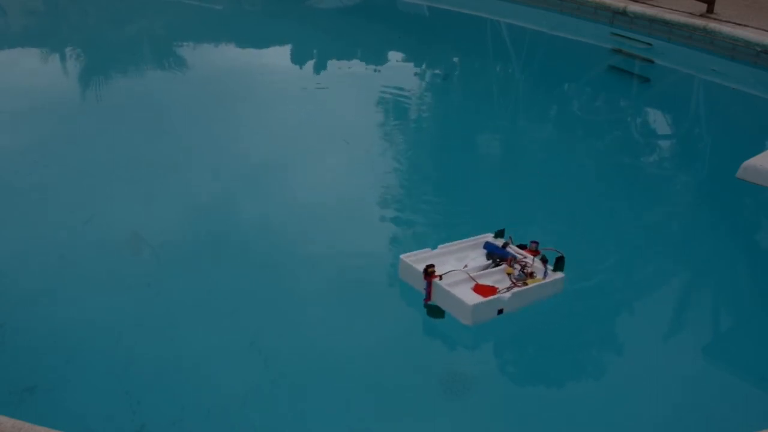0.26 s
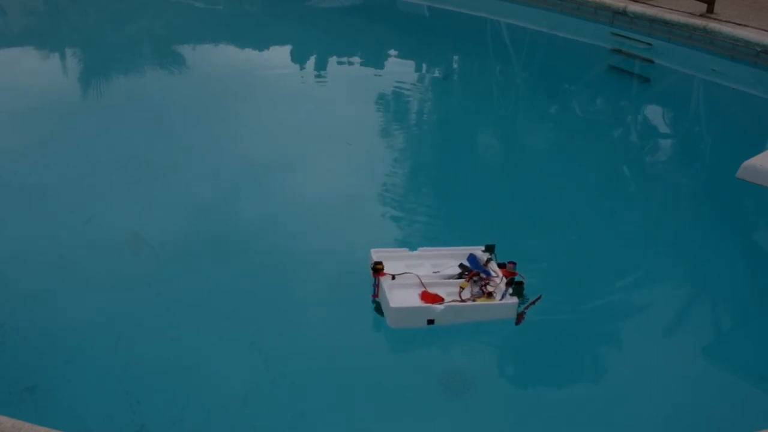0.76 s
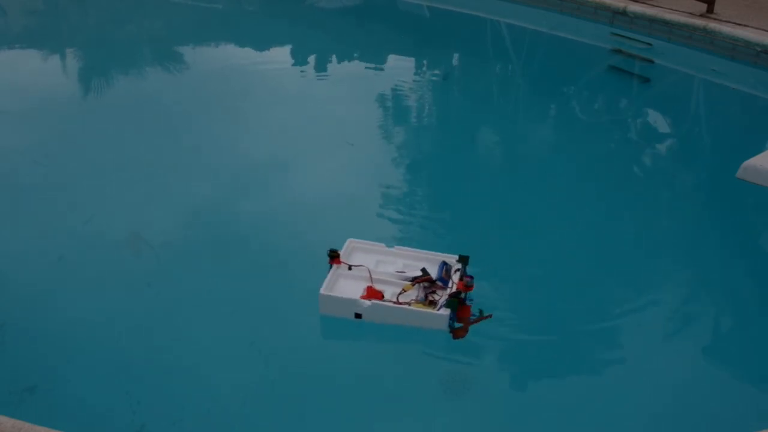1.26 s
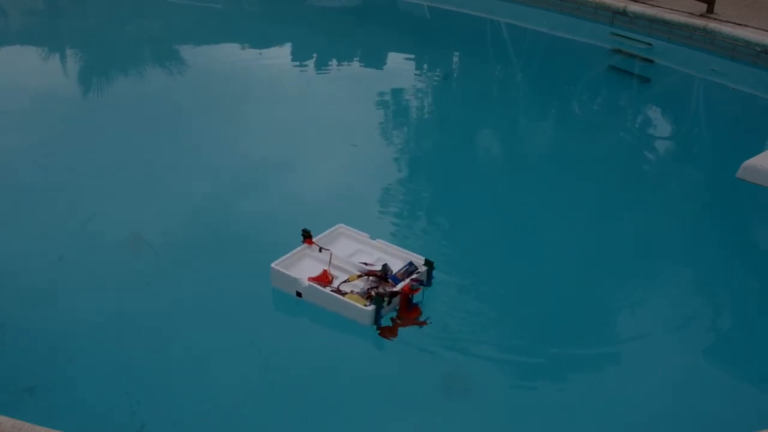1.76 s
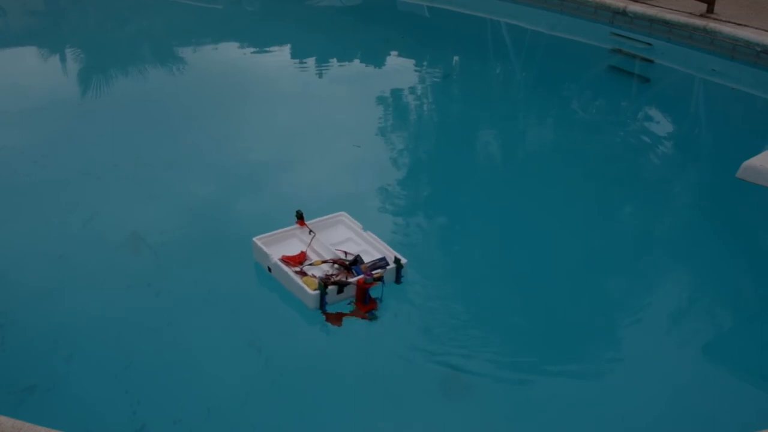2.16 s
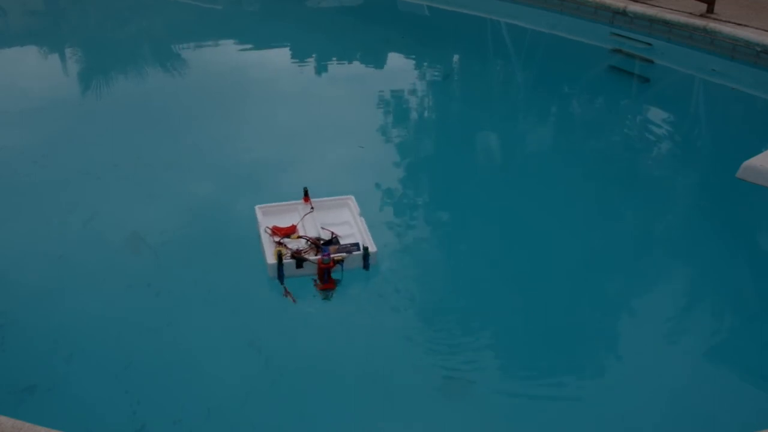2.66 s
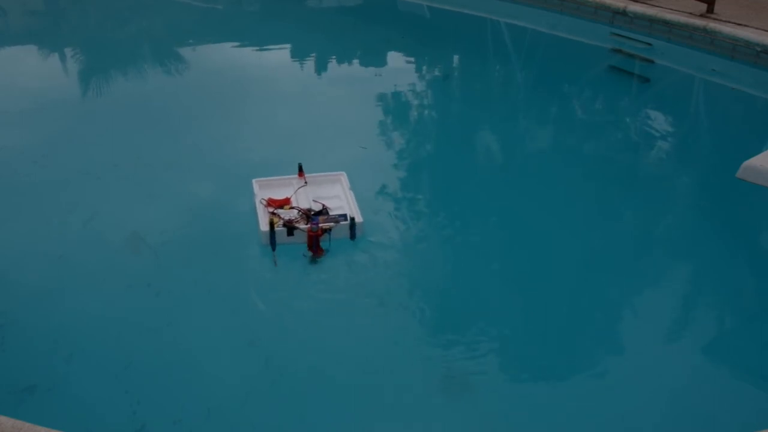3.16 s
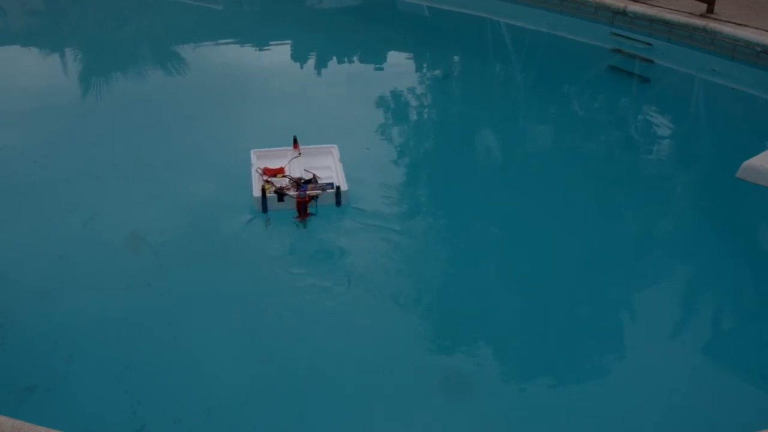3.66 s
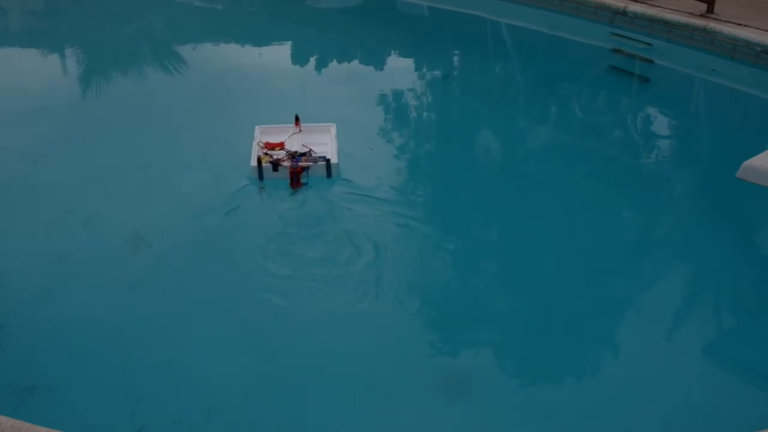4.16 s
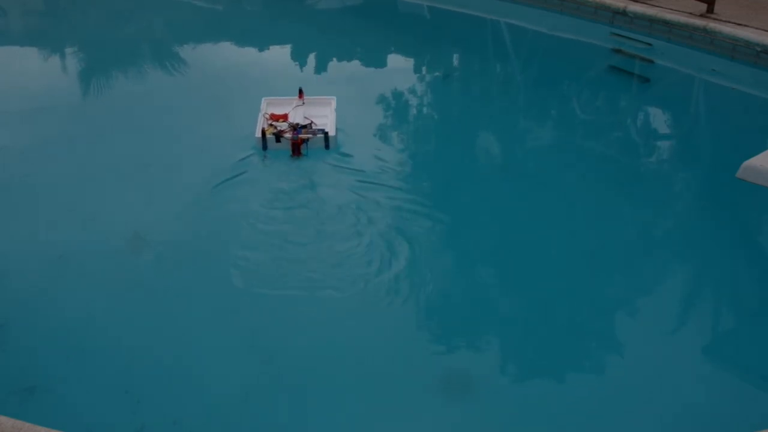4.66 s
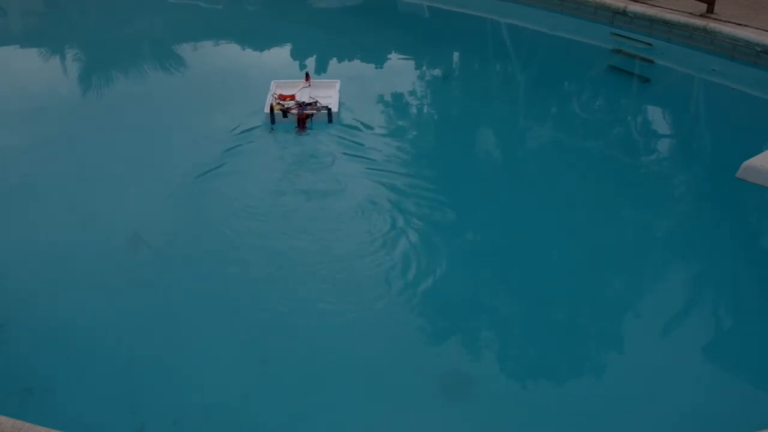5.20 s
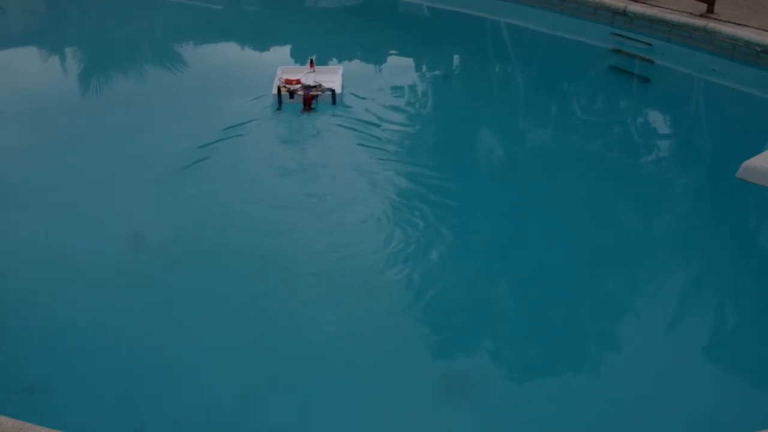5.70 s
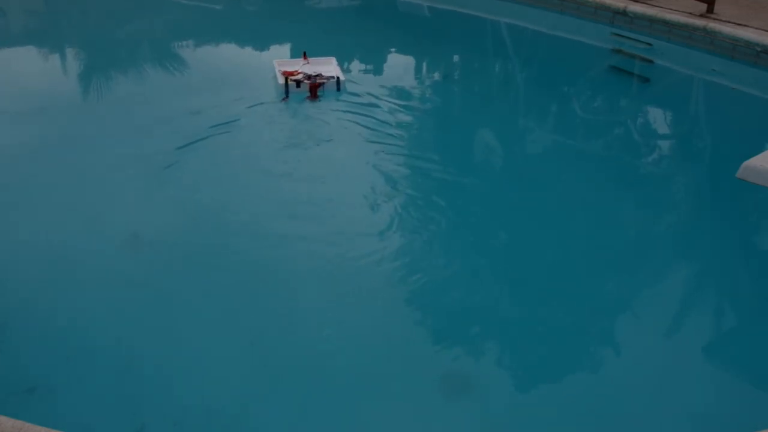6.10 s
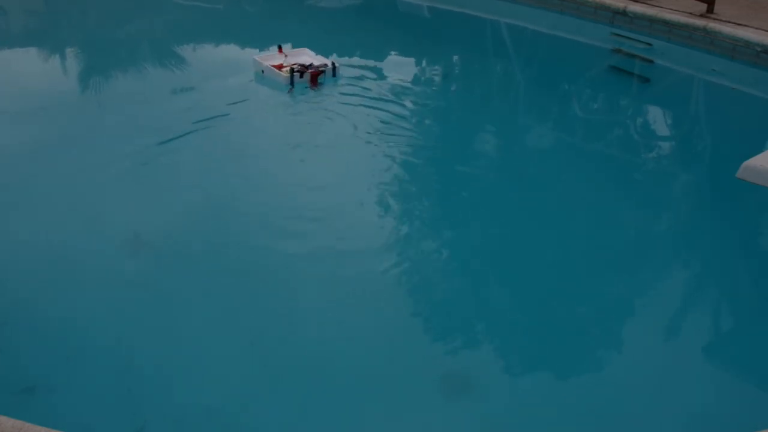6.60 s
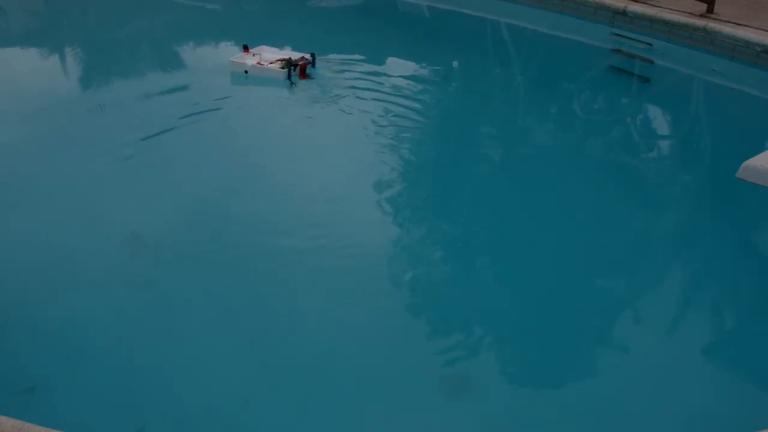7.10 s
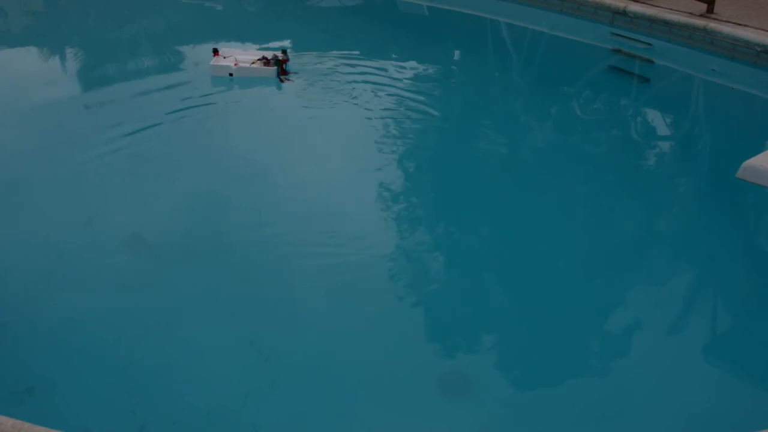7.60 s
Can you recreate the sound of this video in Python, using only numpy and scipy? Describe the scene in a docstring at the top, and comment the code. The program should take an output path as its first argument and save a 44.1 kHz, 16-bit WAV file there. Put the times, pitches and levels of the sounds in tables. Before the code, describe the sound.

The buzzing gears and thin high whine of a model boat run steadily, surge twice, then settle as it moves away.

```python
"""Model boat on a swimming pool.

A small boat with a foam tray for a hull turns, speeds up twice and moves off. Its motor drives the
propeller through a 6:1 gear: the teeth clatter in the hull, hardest once a propeller turn, with a knock
and a squeak. The motor hums, its brushes rasp, and the speed controller's switching whines high above."""
import sys
import numpy as np
from scipy import signal
from scipy.fft import rfft, irfft
from scipy.io import wavfile
from scipy.ndimage import uniform_filter1d

SR = 44100
rng = np.random.default_rng(int(sys.argv[2]) if len(sys.argv) > 2 else 0)


def wav_record(signal):
    """Record a signal, one row per channel, as 16-bit PCM in the file named by sys.argv[1]."""
    frames = np.transpose(np.atleast_2d(signal))
    bounded = np.clip(frames, -1, 1)
    # unit amplitude maps onto the largest positive 16-bit level
    quanta = np.round(bounded * 32767).astype(np.int16)
    wavfile.write(sys.argv[1], SR, quanta)


N = 346180
TIME = np.arange(N) / SR
PINION_TEETH, GEAR_RATIO = 12, 6


def undb(db):
    """Decibels to gain."""
    return 10 ** (np.asarray(db) / 20)


def unit(x):
    """Scale to rms 1."""
    return x / np.sqrt(np.mean(x ** 2))


def curve(table):
    """Interpolate (t/s, value) rows to every sample."""
    return np.interp(TIME, *np.transpose(table))


def wander(rate_hz):
    """Smooth random motion, rms 1."""
    hold = max(int(SR / rate_hz), 2)
    steps = np.repeat(rng.standard_normal(N // hold + 1), hold)[:N]
    return unit(uniform_filter1d(steps, hold))


def tone(cycles, slip, rate_hz=40):
    """Sine of rms 1, wavering in level and, by slip cycles rms, in phase."""
    size = undb(1.8 * wander(rate_hz))
    return unit(np.sin(2 * np.pi * (cycles + slip * wander(rate_hz))) * size)


def band(x, lo_hz, hi_hz):
    """Steep band-pass."""
    return signal.sosfilt(signal.butter(4, [lo_hz, hi_hz], "band", fs=SR, output="sos"), x)


def colour(x, response, size=4096):
    """Minimum-phase filter from (f/Hz, level/dB) rows."""
    hz, db = np.transpose(response)
    bins_hz = np.maximum(np.arange(size // 2 + 1) * SR / size, 1)
    cepstrum = irfft(np.log(undb(np.interp(np.log(bins_hz), np.log(hz), db))))
    cepstrum[1:size // 2] *= 2
    cepstrum[size // 2 + 1:] = 0
    return signal.fftconvolve(x, irfft(np.exp(rfft(cepstrum))))[:N]


def radiate(x, responses, views, lo_hz, hi_hz):
    """Crossfade the responses of the turning boat's sides, each levelled within a band."""
    out, views = 0, np.array(views)
    for response, db, active in zip(responses, views[:, 2], np.eye(len(views))):
        heard = colour(x, response)
        fade = np.interp(TIME, views[:, :2].ravel(), np.repeat(active, 2))
        out = out + fade * undb(db) * heard / band(heard, lo_hz, hi_hz).std()
    return out


def racing(speed_rps):
    """0 at cruising speed, 1 at full throttle."""
    return np.interp(speed_rps, [120, 185], [0, 1])


def wheel_angle(turns, tight_at=.49):
    """Gear wheel angle in radians from its tightest point, given motor turns."""
    return 2 * np.pi * (turns / GEAR_RATIO - tight_at)


def mesh_load(turns, depth):
    """The wheel runs out of true and presses hardest once a propeller turn."""
    angle = wheel_angle(turns)
    return (1 + depth * (np.cos(angle) + .27 * np.cos(2 * angle))) / np.sqrt(1 + depth ** 2 / 2)


# Boat's course: t/s, distance/m
COURSE = [(0, 2.94), (1.5, 3.82), (3, 3.6), (4.5, 5.25), (5.2, 5.1), (6, 5.9), (7.85, 6.6)]
def carry(speed_rps, db_per_octave, ref_rps=120, ref_m=3):
    """Gain that grows with shaft speed and falls as 1 / distance."""
    return undb(db_per_octave * np.log2(speed_rps / ref_rps)) * ref_m / curve(COURSE)


# Reflections: initial extra path/m, drift/(m/s), level/dB
ECHOES = [(.9, .05, -14), (2.6, -.12, -15), (5.5, .06, -18)]
def poolside(x, sound_m_per_s=343):
    """The poolside returns late copies that comb the noise, shifting as the boat moves."""
    copies = sum(undb(db) * np.interp(TIME - (path_m + drift * TIME) / sound_m_per_s, TIME, x)
                 for path_m, drift, db in ECHOES)
    return (x + copies) / np.sqrt(1 + sum(undb(db) ** 2 for _, _, db in ECHOES))


# Outdoor air spectrum: f/Hz, level/dB
AIR = [(15, -35), (30, -3), (60, -2.5), (100, -8.5), (200, -4), (500, -12.5), (2000, -78), (15000, -74)]
def background(air_db=-60, mains_db=-68, hum_hz=119.6):
    """Still outdoor air and a faint mains hum."""
    mains = tone(hum_hz * TIME, slip=.02)
    air = unit(colour(rng.standard_normal(N), AIR))
    return air * undb(air_db) + mains * undb(mains_db)


# Switching tone, swelling and fading as the boat moves: t/s, level/dB
WHINE = [(0.0, -53), (0.08, -53), (0.22, -34.5), (0.39, -47), (0.98, -39), (1.09, -46), (1.53, -36),
         (1.68, -51), (2.53, -36), (2.69, -44), (2.73, -36.5), (4.26, -46.5), (4.33, -39), (6.16, -54),
         (6.23, -40), (6.3, -50), (6.43, -36), (6.78, -48), (7.61, -43), (7.85, -51)]
def controller(turns, speed_rps, idle_hz=12346, idle_rps=105, sag_hz_per_rps=.93):
    """Switched current makes the windings sing; the turning rotor adds side tones."""
    switch_hz = idle_hz - sag_hz_per_rps * (speed_rps - idle_rps)  # the supply sags under throttle
    cycles = np.cumsum(switch_hz) / SR
    sides = [(2, 0), (-2, -1), (4, -17), (-4, -17), (1, -15), (-1, -15), (-3, -15), (-6, -15)]
    ripple = sum(undb(db) * tone(cycles + order * turns, slip=.14, rate_hz=35) for order, db in sides)
    fizz = tone(cycles, slip=.26, rate_hz=87)
    centre = tone(cycles, slip=.07 + .12 * racing(speed_rps), rate_hz=25) * undb(1.5 * wander(20))
    return centre * undb(curve(WHINE) + 1) + ripple * undb(-49) + fizz * undb(-54)


# Squeak toward the listener: t/s, level/dB
SQUEAK = [(1.6, -62), (2.25, -38), (2.8, -50), (3.15, -34), (3.6, -35.5), (4.25, -28), (4.8, -28.5),
          (5.3, -37), (5.5, -47), (6.5, -46), (7, -62)]
def squeak(turns, speed_rps, spot_turns=.91, width_turns=.035):
    """One spot of the wheel chafes: a tiny squeak each wheel turn, higher at speed."""
    hz = np.interp(speed_rps, [122, 140, 205], [6900, 8500, 9300])
    hz *= 1 + .04 * (.3 + racing(speed_rps)) * wander(900)
    offset_turns = (turns / GEAR_RATIO - spot_turns + .5) % 1 - .5
    contact = np.exp(-(offset_turns / width_turns) ** 2 / 2)
    return tone(np.cumsum(hz) / SR, slip=.1) * contact * undb(curve(SQUEAK))


def knock(turns, speed_rps):
    """Soft knock at the wheel's tightest point; the hull radiates it only as speed lifts its pitch."""
    puffs = np.exp(1.8 * np.cos(wheel_angle(turns)))
    thud = unit(tone(11 * turns / GEAR_RATIO, slip=.03) * puffs)
    return band(thud, 275, 520) * undb(-52) * carry(speed_rps, db_per_octave=12)


# Gear tones, swelling as the hull turns or rings: t/s, sigma/s, propeller order, level/dB
MESH_TONES = [(.62, 0.11, 16, -48.5), (2.05, 0.35, 47, -41), (3.5, 0.1, 132, -41), (3.572, 0.23, 72, -40.5),
              (4.03, 0.095, 34, -36), (4.26, 0.098, 25, -29.5), (4.56, 0.17, 22, -33), (4.57, .09, 28, -39),
              (4.55, 0.22, 72, -40), (4.62, .12, 150, -43), (4.883, 0.12, 47, -38.5),
              (5.172, 0.11, 72, -39.5), (6.85, 0.27, 61, -43.5), (7.05, 0.36, 84, -44), (7.2, 1, 26, -51.5),
              (7.5, 0.43, 43, -47)]
def mesh_whine(turns, load):
    """Tones of the meshing teeth throb with the wheel; play blurs the higher ones most."""
    out = 0
    for peak_s, sigma_s, order, db in MESH_TONES:
        line = tone(order * turns / GEAR_RATIO, slip=min(.06 + order / 420, .21), rate_hz=55)
        swell = np.exp(-((TIME - peak_s) / sigma_s) ** 2 / 2)
        out = out + line * undb(db) * swell
    return out * load


# Commutation hum, swelling as the boat turns: t/s, level/dB
COMMUTATION = [(0, -34.5), (.12, -51), (.2, -38), (.48, -33.5), (.58, -38.5), (.66, -33.5), (.86, -37.5),
               (1, -41.5), (1.25, -39), (1.48, -52), (1.58, -36), (1.68, -40), (1.75, -64), (2.2, -40),
               (2.92, -34.5), (3.1, -43), (3.3, -41), (3.6, -40), (3.9, -39), (4.05, -32), (4.2, -36),
               (4.4, -49), (4.52, -39), (4.68, -37), (4.8, -43), (5.1, -41.5), (5.18, -32.5), (5.27, -32),
               (5.38, -44), (5.52, -36.5), (5.85, -45.5), (6.05, -37.5), (6.3, -47), (6.8, -44.5),
               (7.25, -44.5), (7.45, -54), (7.85, -43)]
def commutation(turns, speed_rps, load):
    """Six commutations a turn hum, clean when slow; faster, the shaft shakes, lags and chugs."""
    slip = np.interp(speed_rps, [107, 122, 160, 185], [.045, .115, .11, .3])
    throb = np.interp(speed_rps, [107, 122], [.49, .58])
    lag_cycles = .11 * racing(speed_rps) * np.sin(wheel_angle(turns))
    hum = tone(6 * turns - lag_cycles, slip, rate_hz=55)
    return hum * (1 + throb * (load - 1)) * undb(curve(COMMUTATION))


# Hull's main resonance: f/Hz, level/dB
HULL_RESONANCE = [(300, -47.5), (420, -16.5), (480, -10.5), (540, -15), (600, -7.5), (660, -3), (720, 1),
                  (770, -1.5), (815, -2), (870, -12), (1000, -17), (2000, -41)]
# Purr toward the listener, relative: t/s, level/dB
PURR = [(0, -51), (2.5, -31), (3.3, -31), (3.8, -25.5), (4.05, -36.5), (4.22, -31), (4.6, -29),
        (5.1, -31.5), (5.5, -33), (7.85, -34.5)]
def purr(turns, speed_rps, depth):
    """The rotor's pull on the magnets rings the hull in puffs, one a propeller turn."""
    sharpness = .58 + 4 * depth * racing(speed_rps)
    puffs = np.exp(sharpness * np.cos(wheel_angle(turns))) / np.sqrt(np.i0(2 * sharpness))
    shake_cycles = (.04 + .02 * racing(speed_rps)) * wander(50)
    pull = np.sqrt(2) * np.sin(2 * np.pi * (4 * turns + shake_cycles)) * puffs
    return colour(pull, HULL_RESONANCE) * undb(curve(PURR)) * carry(speed_rps, db_per_octave=2)


# Brush spectrum by view of the boat: f/Hz, level/dB
BRUSH_SIDE = [(1900, -17), (2900, 1.5), (3500, -3), (5030, 4), (5850, -6.5), (7400, -5), (8350, -2),
              (9400, -9), (11000, -16.5), (12300, -7), (13700, -16), (15300, -21)]
BRUSH_QUARTER = [(1900, -17), (2750, 2.5), (3400, -6), (4200, -2), (5200, 3.5), (6000, -6), (6600, -5),
                 (7400, -10.5), (8400, 2), (9500, -8.5), (11000, -14), (12300, -12), (15300, -21)]
BRUSH_TURN = [(1900, -24), (3100, -16), (4100, -2.5), (4800, -1), (6050, -10), (6860, -4), (7460, -10),
              (8350, -2), (10400, -15.5), (12300, -14), (14000, -28), (15300, -31)]
BRUSH_STERN = [(1900, -6), (2900, -10), (4200, 5.5), (5160, 1), (5900, -5), (8500, -4.5), (9700, -9.5),
               (11100, -16), (12300, -7), (15300, -28)]
BRUSH_AWAY = [(1900, -17.5), (2900, -1.5), (5290, 0.5), (5900, -3.5), (7090, 0), (8600, -0.5), (9400, -3.5),
              (10200, -8), (12300, -17), (15300, -21)]
BRUSH_FAR = [(1900, -5.5), (2900, -4.5), (4260, 1), (5430, 2.5), (6000, -3.5), (6600, -1), (8450, 0),
             (10500, -8.5), (12300, -1), (14000, -19), (15300, -30)]
BRUSH_FAR_SIDE = [(1900, -40), (3200, 2.5), (4550, 8), (5450, 7), (6050, -5), (6800, -1), (9000, -3),
                  (10000, -8), (12300, -6), (14000, -16), (15300, -41)]
# Those views in order: from t/s, to t/s, relative level/dB
BRUSH_VIEWS = [(0, 0.58, -37), (1.5, 2.26, -36.5), (2.4, 2.4, -37), (3.4, 3.36, -36.5), (4.4, 4.43, -38.5),
               (5.5, 6.1, -40), (7.302, 8.5, -34)]
def brushes(turns, speed_rps, load, hiss_s=2.754, hiss_width_s=.06, hiss_db=5.5):
    """Fine scraping swells twice a shaft turn; a brief swell of hiss sounds once."""
    grains = rng.standard_normal(N) * undb(1.7 * wander(1500))
    ripple = 1 + .11 * np.cos(4 * np.pi * turns)  # the rotor passes the magnets
    throb = 1 + .61 * (load - 1)
    responses = [BRUSH_SIDE, BRUSH_QUARTER, BRUSH_TURN, BRUSH_STERN,
                 BRUSH_AWAY, BRUSH_FAR, BRUSH_FAR_SIDE]
    rasp = radiate(unit(grains * ripple * throb), responses, BRUSH_VIEWS, 3000, 6000)
    hiss_swell = undb(hiss_db * np.exp(-((TIME - hiss_s) / hiss_width_s) ** 2))
    return hiss_swell * band(rasp, 1500, 17000) * carry(speed_rps, db_per_octave=13.5)


def flanks(turns, worn_share=.57, size=8192, harmonics=320):
    """Tooth flanks slide: the same roughness every wheel turn, mixed with chance scraping."""
    spectrum = np.exp(2j * np.pi * rng.random(harmonics)) * (np.arange(harmonics) > 0)
    surface = irfft(spectrum, size)
    place = (turns / GEAR_RATIO + .0013 * wander(40)) % 1
    worn = unit(np.interp(place * size, np.arange(size), surface) * np.sqrt(np.gradient(turns)))
    fresh = unit(band(rng.standard_normal(N), 100, 7200))
    return np.sqrt(worn_share) * worn + np.sqrt(1 - worn_share) * fresh


def tooth_blows(turns, wear_db=2, chance_db=6.5, backlash_teeth=.23):
    """Each tooth strikes with its own force and play, the same every wheel turn, plus chance."""
    wear = rng.standard_normal((PINION_TEETH * GEAR_RATIO, 2))
    tooth = np.arange(1, int(turns[-1] * PINION_TEETH) - 2)
    own_play, own_force = wear[tooth % len(wear)].T
    chance_play, chance_force = rng.standard_normal((len(tooth), 2)).T
    play = backlash_teeth * (.5 * own_play + chance_play)
    at_sample = np.interp((tooth + play) / PINION_TEETH, turns, np.arange(N)).astype(int)
    force = undb(wear_db * np.tanh(own_force) + chance_db * chance_force)
    blows = np.bincount(at_sample, force, N)
    blows -= uniform_filter1d(blows, SR // 50)
    return unit(blows / np.sqrt(np.gradient(turns)))  # power independent of tooth rate


# Drive tones: propeller order, level/dB re tooth blows
DRIVE_TONES = [(16, -28), (31, -25), (35, -23), (38, -26)]
# Hull response by view of the boat: f/Hz, level/dB
HULL_SIDE = [(100, -30), (200, -6), (280, -1), (380, -2), (520, 5), (700, 4), (1000, 5), (1300, 2.5),
             (1550, 6), (2000, -0.5), (2800, -4), (3500, -10.5), (5000, -39)]
HULL_TURN = [(100, -60), (200, -19), (280, 4.5), (380, -6), (500, 7), (600, -0.5), (720, 5.5), (820, 2.5),
             (930, 1.5), (1200, -0.5), (1550, 2.5), (1800, 1), (2250, 3), (2800, -7), (3200, -16),
             (5000, -26)]
HULL_STERN = [(100, -56), (200, -3), (270, -0.5), (370, -4), (520, 0.5), (630, -2), (760, 11), (850, 6),
              (980, 5), (1300, -0.5), (1550, 2), (1900, 2), (2350, -3), (2800, -3.5), (3500, -14),
              (5000, -54)]
HULL_AWAY = [(100, -36), (200, -6), (250, 5), (330, -7), (410, 5), (500, 3.5), (630, -3), (770, 13),
             (850, 5), (980, 5.5), (1300, -1.5), (1570, 4), (1900, -1.5), (2400, 1), (2800, -9), (3500, -8),
             (5000, -39)]
HULL_FAR = [(100, -64), (200, -12), (290, -6), (380, -5), (520, -9), (620, -3), (730, 3), (830, -10),
            (950, 1), (1120, -10.5), (1500, -6), (1750, -6), (2200, -7), (2700, -15.5), (3500, -14.5),
            (5000, -31.5)]
HULL_FAR_TURN = [(100, -59), (200, -21), (290, -6), (380, -13), (520, -9), (620, -3.5), (730, 5), (830, -4),
                 (950, -0.5), (1120, -6.5), (1500, -3.5), (1750, -6.5), (2200, -2.5), (2700, -9.5),
                 (3500, -14), (5000, -32)]
HULL_FAR_SIDE = [(100, -62), (200, -21), (380, -9), (520, -10), (620, -11), (730, -4), (830, -3.5),
                 (950, -5), (1120, -5.5), (1500, -5), (1750, -8.5), (2200, -9), (2700, -15), (3500, -15),
                 (5000, -38)]
# Those views in order: from t/s, to t/s, relative level/dB
HULL_VIEWS = [(0, 1.5, -34), (2, 2.68, -33), (3.203, 3.8, -34), (4.5, 4.83, -33.5), (5.5, 6, -33),
              (6.75, 7.36, -32), (7.5, 9, -35)]
def gears(turns, speed_rps, load):
    """Tooth blows, rubbing flanks and weak drive tones throb with the load and ring the hull."""
    blows = tooth_blows(turns)
    rub = undb(-2) * unit(band(flanks(turns), 600, 5600))
    lines = sum(undb(db) * tone(order * turns / GEAR_RATIO, slip=.2, rate_hz=30)
                for order, db in DRIVE_TONES)
    responses = [HULL_SIDE, HULL_TURN, HULL_STERN, HULL_AWAY, HULL_FAR, HULL_FAR_TURN, HULL_FAR_SIDE]
    clatter = radiate((blows + rub + lines) * load, responses, HULL_VIEWS, 1050, 2900)
    return clatter * carry(speed_rps, db_per_octave=6)


# Motor shaft, two bursts of throttle: t/s, speed/rps
SPEED = [(0, 106.7), (.25, 104.3), (.7, 103.4), (1.4, 107.2), (1.68, 107), (1.82, 115.5), (2.23, 120.6),
         (2.6, 118.8), (2.88, 120.8), (3.05, 140.3), (3.2, 161.5), (3.42, 190.7), (3.7, 192.4),
         (3.88, 182.4), (4.02, 161), (4.12, 160.7), (4.3, 177.6), (4.5, 206), (4.6, 211.4), (4.7, 207.6),
         (4.8, 199.6), (4.95, 196.3), (5.13, 171.3), (5.3, 155.5), (5.43, 129.5), (5.58, 132.8),
         (5.72, 130.5), (5.9, 122.1), (6.15, 119.5), (6.65, 120.8), (6.8, 124.7), (7.2, 127), (7.85, 123.6)]
# Unevenness of the mesh: t/s, depth (0-1)
THROB = [(0, 0.3), (0.9, 0.37), (1.7, 0.25), (2.8, 0.19), (3.2, 0.17), (3.55, 0.11), (3.85, 0.13),
         (4.1, 0.14), (5, 0.19), (5.8, 0.16), (6.7, 0.14), (7.25, 0.3), (7.85, 0.19)]
def scene():
    """One shaft drives every sound of the boat, over still air; mono."""
    speed_rps, depth = curve(SPEED), curve(THROB)
    turns = np.cumsum(speed_rps) / SR
    load = mesh_load(turns, depth)
    clatter = gears(turns, speed_rps, load)
    rasp = brushes(turns, speed_rps, load)
    hum = purr(turns, speed_rps, depth) + commutation(turns, speed_rps, load)
    mesh = mesh_whine(turns, load) + knock(turns, speed_rps)
    noises = poolside(clatter + rasp + squeak(turns, speed_rps))
    return (noises + hum + mesh + controller(turns, speed_rps) + background())[None]


def record(dry, top_hz=15700):
    """Steep low-pass."""
    return signal.sosfilt(signal.ellip(10, .2, 80, top_hz, fs=SR, output="sos"), dry)


dry = scene()
out = record(dry)
wav_record(out)
```